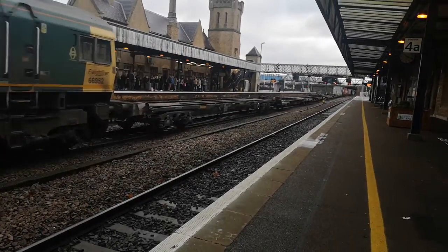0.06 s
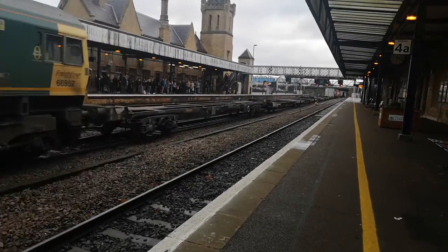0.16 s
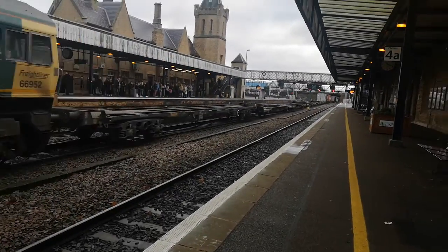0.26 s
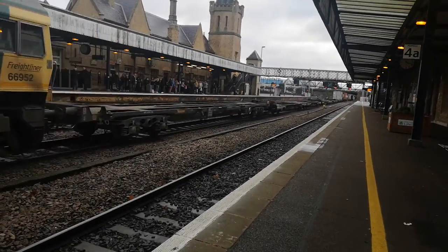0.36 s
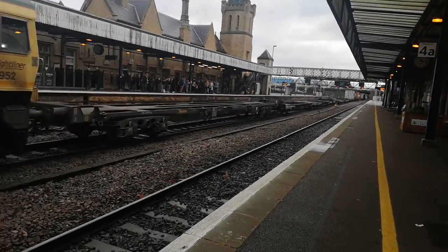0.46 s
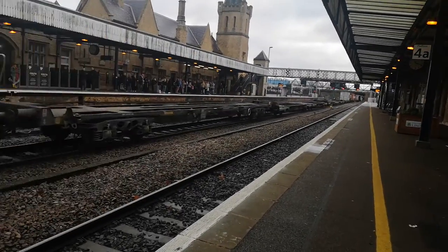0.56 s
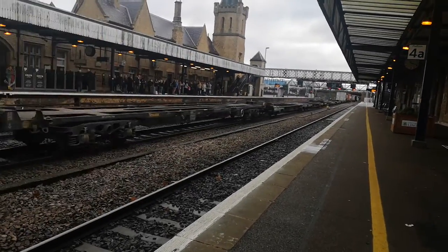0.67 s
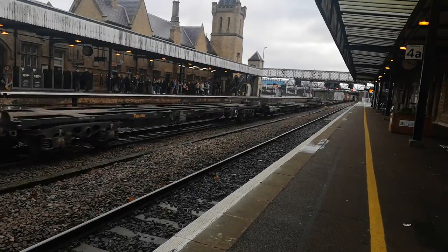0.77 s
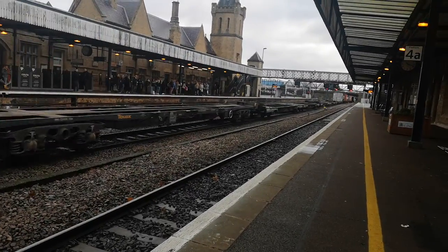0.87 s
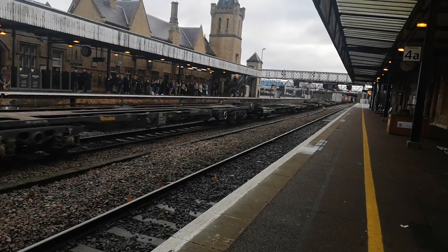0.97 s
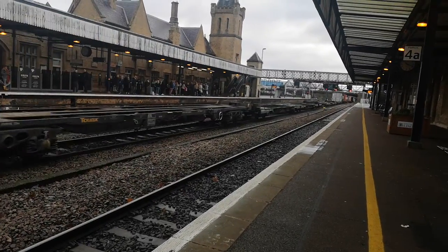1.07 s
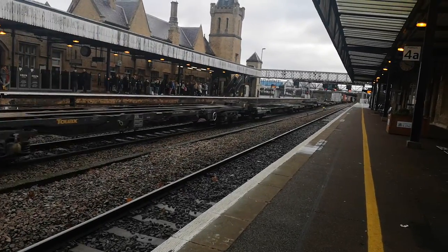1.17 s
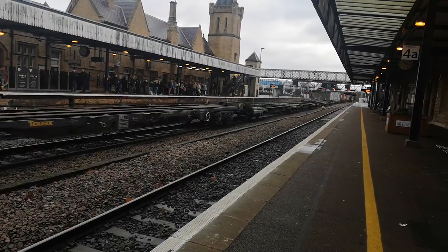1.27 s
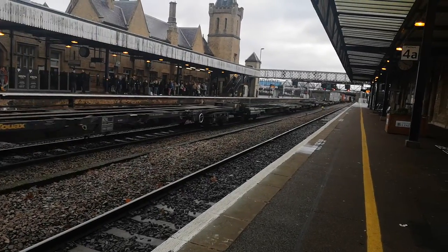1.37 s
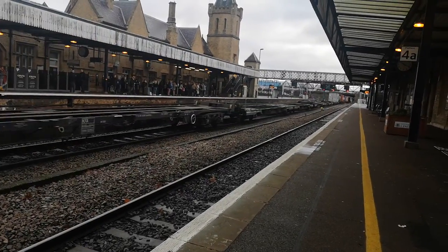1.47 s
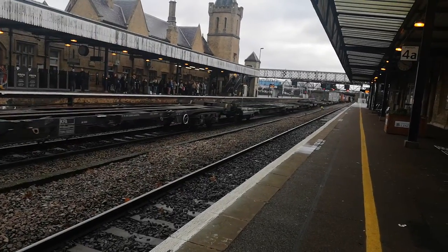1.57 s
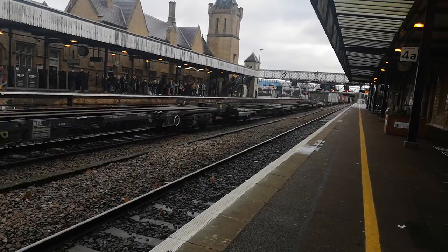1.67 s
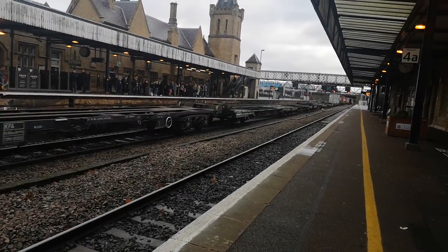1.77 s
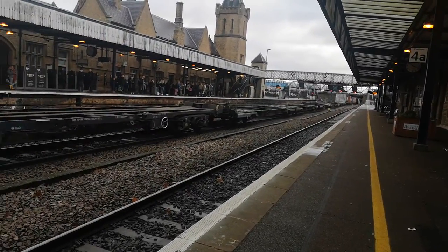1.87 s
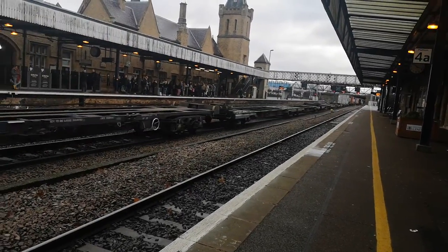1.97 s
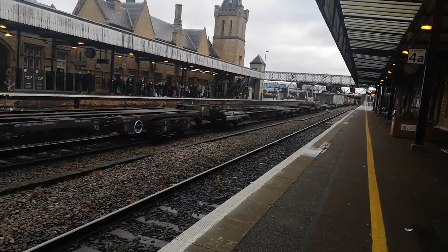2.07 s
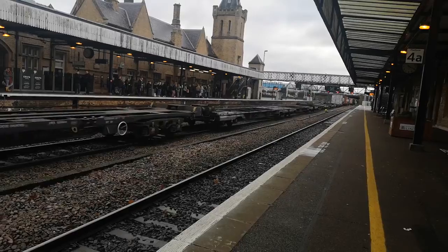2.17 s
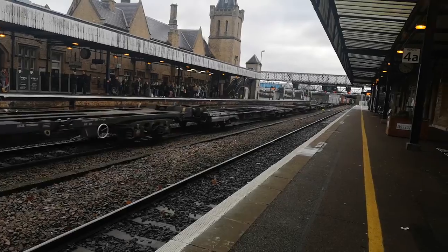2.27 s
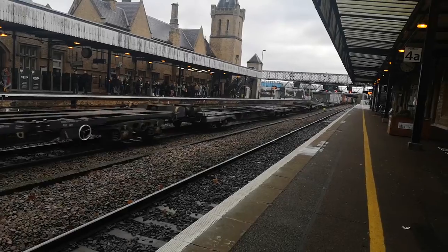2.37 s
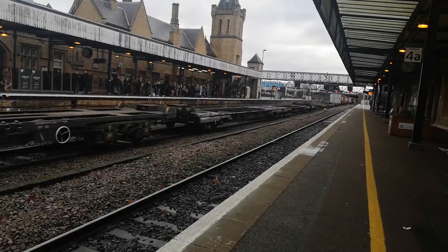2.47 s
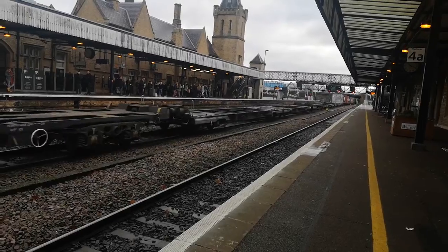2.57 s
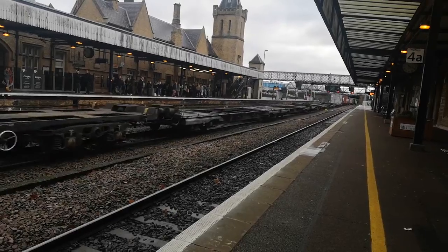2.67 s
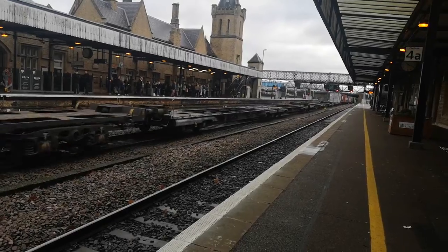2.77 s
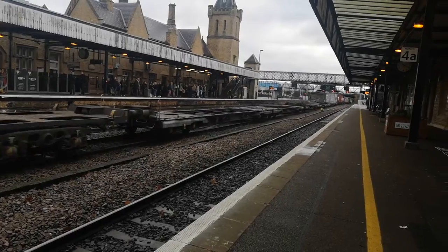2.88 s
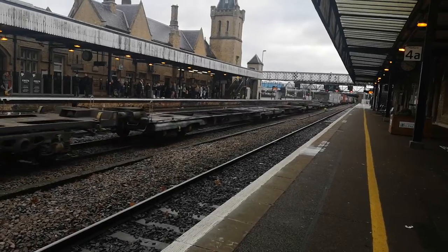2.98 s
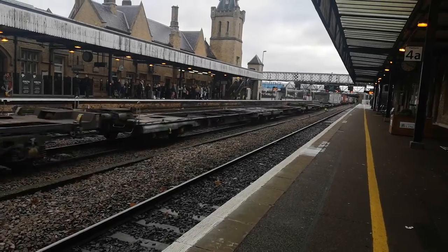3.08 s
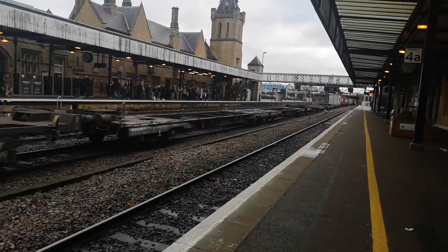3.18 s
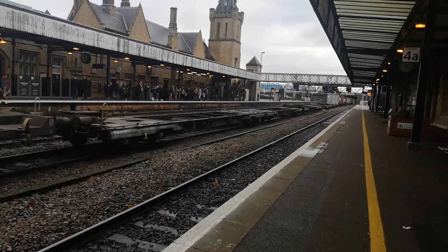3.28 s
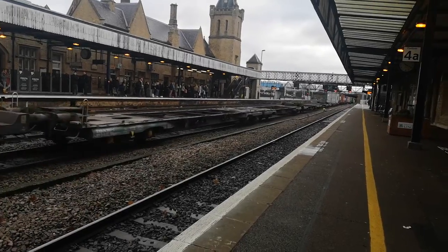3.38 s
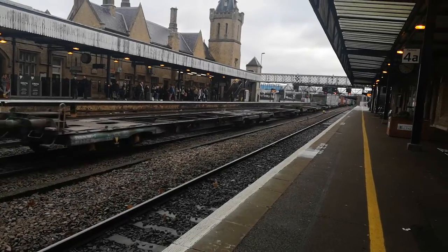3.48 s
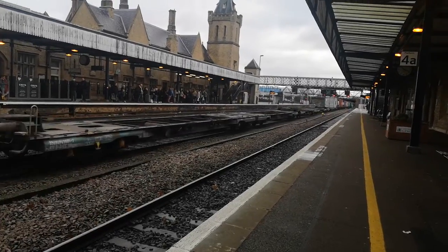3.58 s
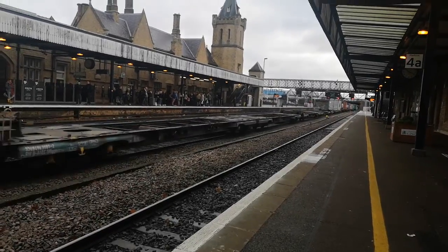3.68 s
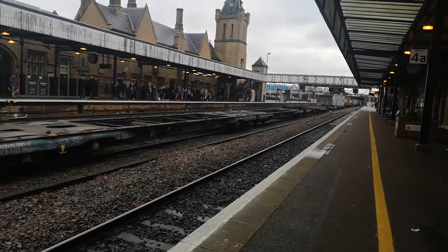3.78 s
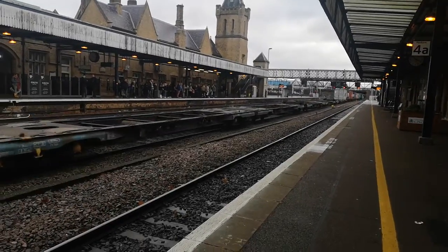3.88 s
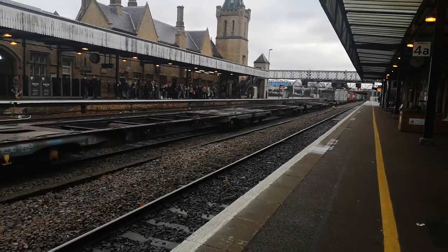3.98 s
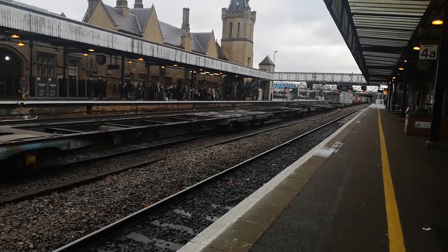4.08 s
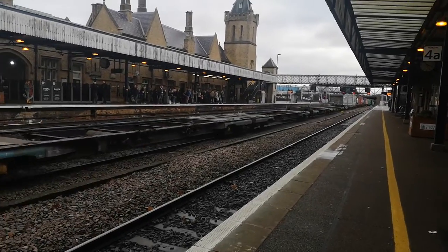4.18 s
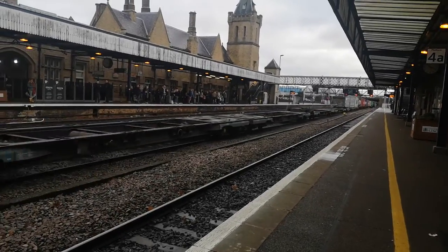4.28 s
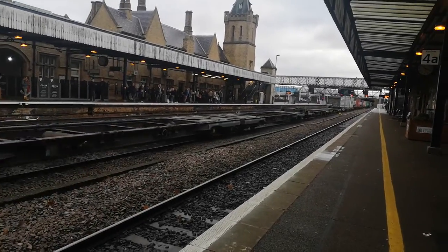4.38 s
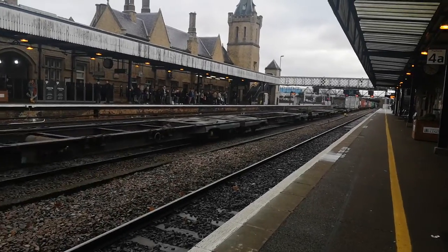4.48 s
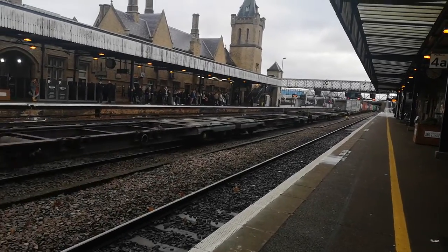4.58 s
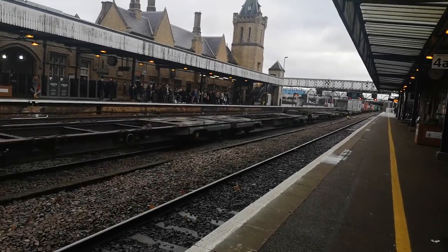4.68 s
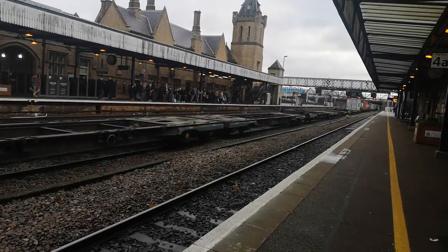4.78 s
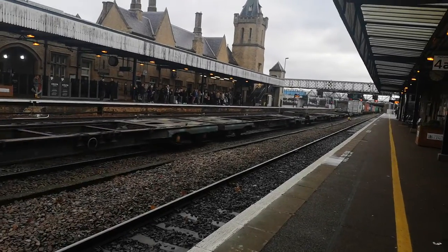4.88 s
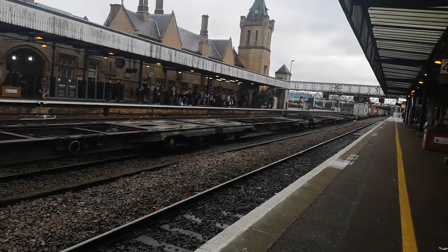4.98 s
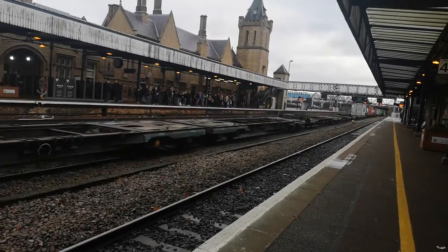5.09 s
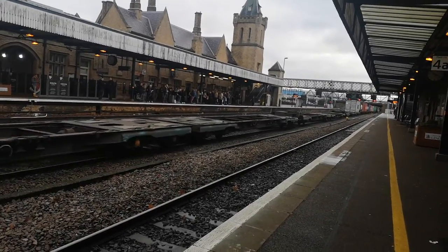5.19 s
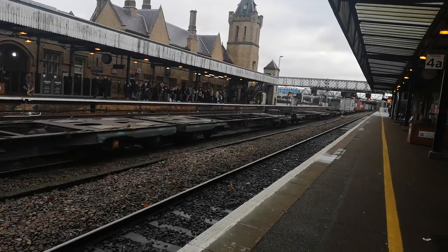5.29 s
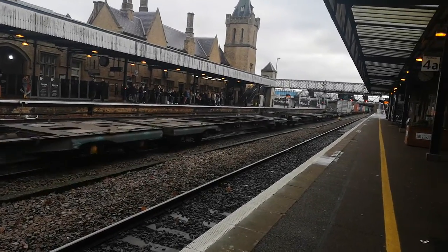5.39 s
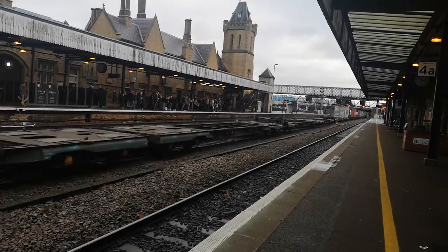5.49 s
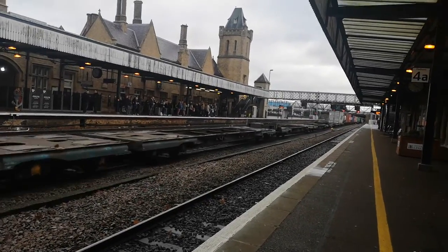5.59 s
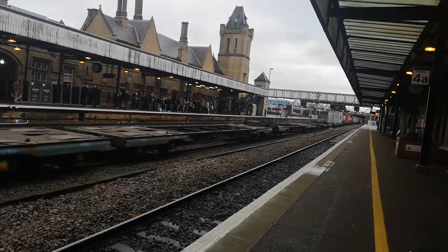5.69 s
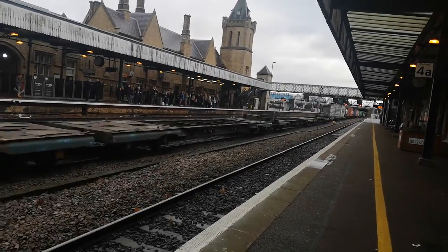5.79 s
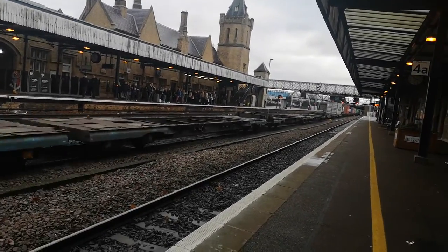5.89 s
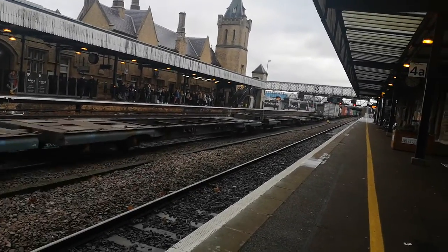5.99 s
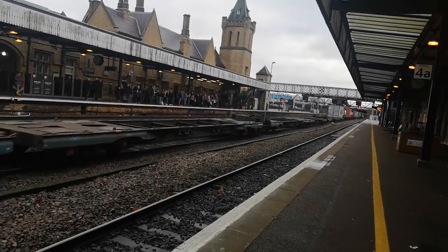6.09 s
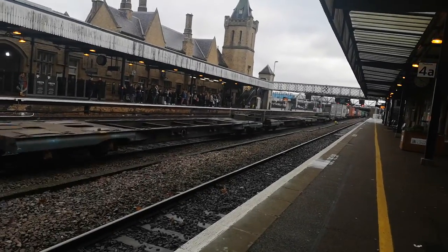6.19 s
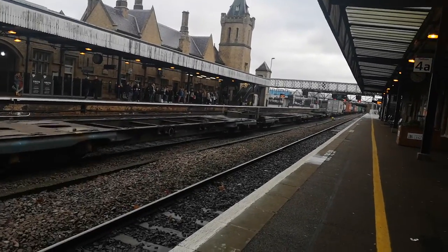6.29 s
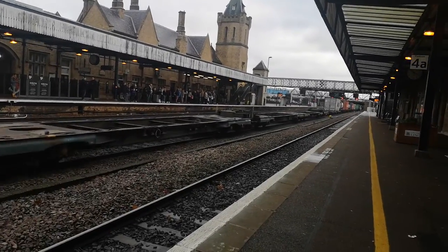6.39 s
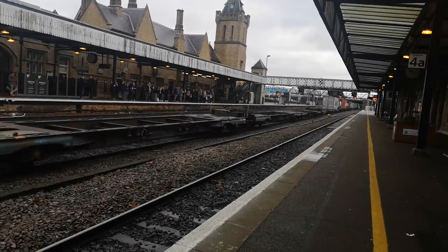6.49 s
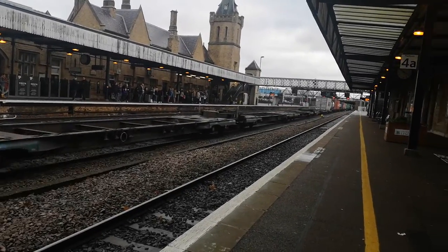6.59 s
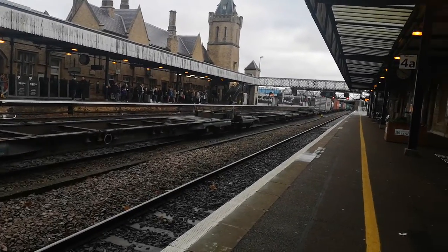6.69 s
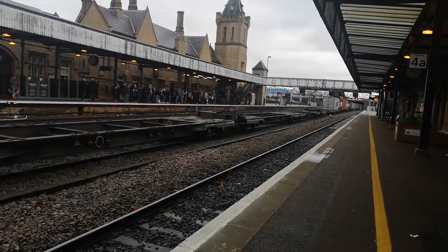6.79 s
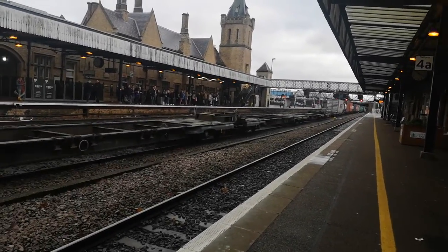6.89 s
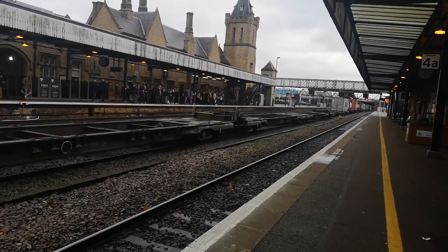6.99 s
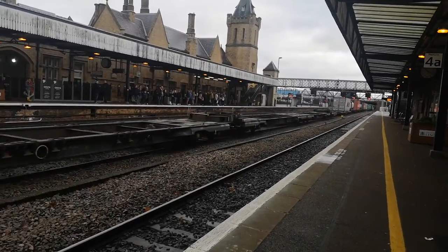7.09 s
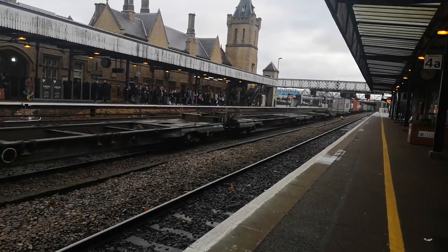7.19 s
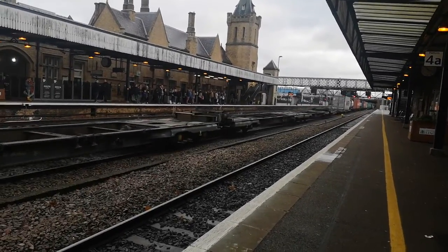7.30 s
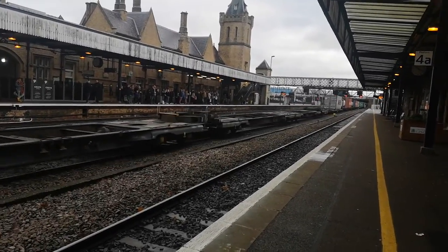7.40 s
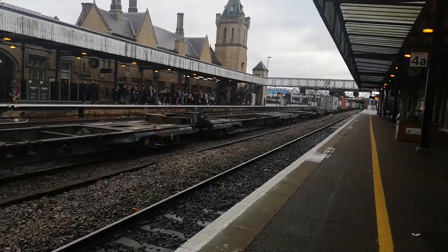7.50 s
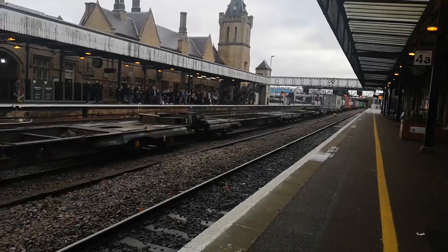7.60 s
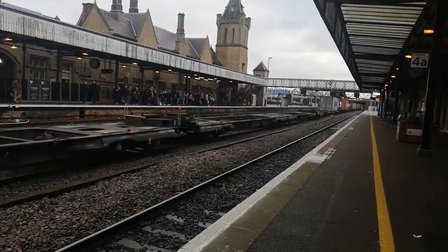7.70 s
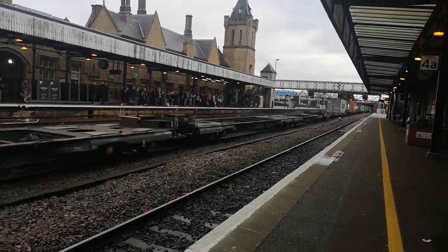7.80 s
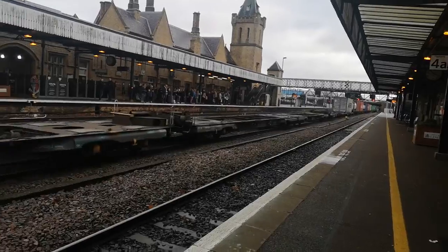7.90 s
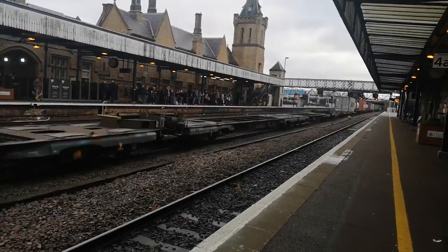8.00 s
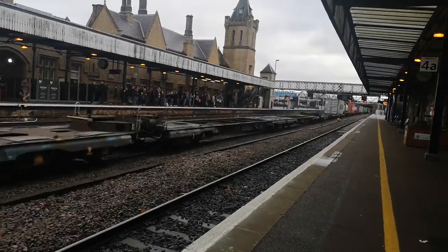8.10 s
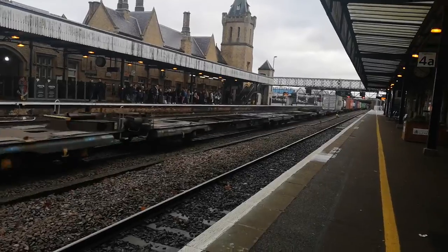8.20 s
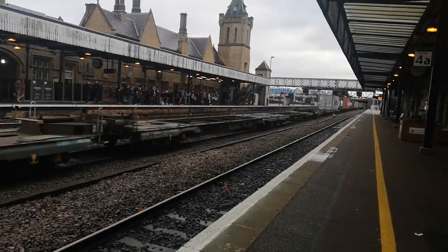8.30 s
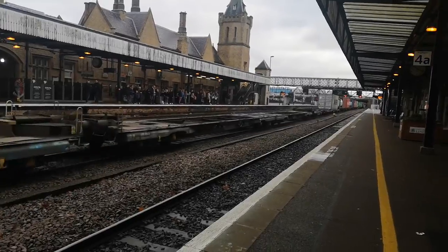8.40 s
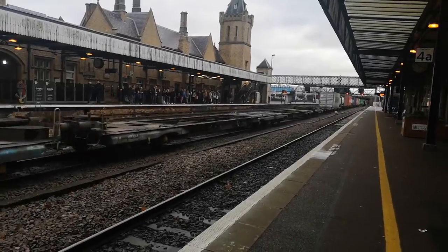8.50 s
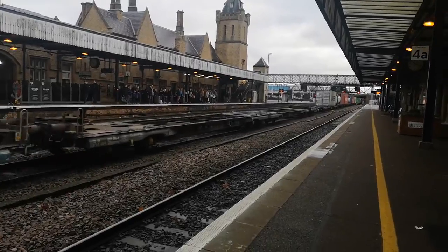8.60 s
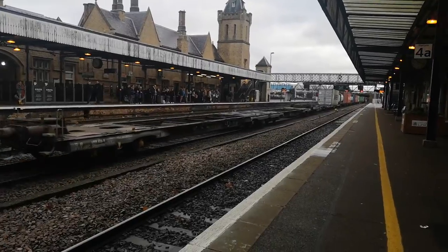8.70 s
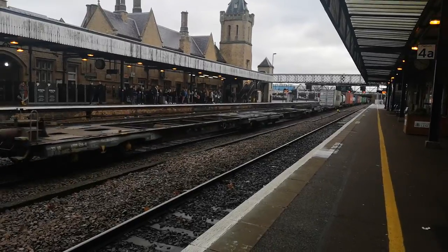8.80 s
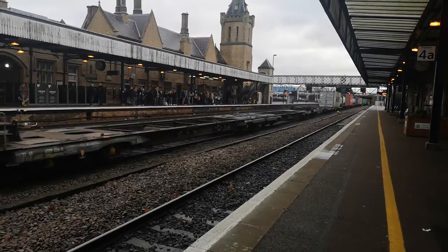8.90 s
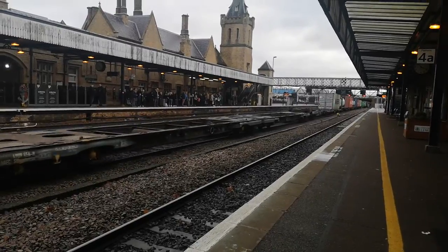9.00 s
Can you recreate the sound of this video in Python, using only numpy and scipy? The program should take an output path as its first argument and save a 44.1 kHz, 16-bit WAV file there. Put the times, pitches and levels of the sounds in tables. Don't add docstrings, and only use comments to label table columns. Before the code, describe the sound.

Deep diesel throb and bright metallic rattle pass close by, giving way to booming, hissing wagons, faint wheel ringing and a late low hum.

```python
import sys
import numpy as np
from scipy import signal
from scipy.fft import rfft, irfft, next_fast_len
from scipy.io import wavfile

SR = 44100
rng = np.random.default_rng(int(sys.argv[2]) if len(sys.argv) > 2 else 0)


def boost(x):
    u = np.asarray(x, float) / 20
    return 10 ** u


def master(y):
    cut = np.clip(np.atleast_2d(y).T, -1, 1)
    pcm = np.round(cut * 32767)
    wavfile.write(sys.argv[1], SR, pcm.astype(np.int16))


N = 398654

# pitch_hz, side_mid_db
STEREO_WIDTH = [(25, -27), (90, -23), (190, -11.5), (280, -9.5), (410, 1), (600, 7.5), (900, 6.5),
                (1300, 0), (15000, 0.5)]
# pitch_hz, left_right_db
PORT_LEAN = [(60, -0.5), (280, -0.4), (600, 1), (900, 1), (1900, 1.5), (2800, 1.5), (4100, 5.5),
             (6000, 4.5), (7600, 10.5), (9000, -5.5), (12000, -3)]
# pitch_hz, lead_rad
PORT_LEAD = [(40, .06), (200, 0), (350, 0.00064), (450, 0.94), (600, 0), (1000, 0.17)]
BASS_LEAD_S = 0.00028

# time_s, turns_per_s
CRANK = [(0.0, 5.75), (.5, 5.735), (1.5, 5.66), (2.0, 5.64), (3.7, 5.63), (4.2, 5.66), (4.9, 5.805),
         (5.2, 5.79), (6.0, 5.664), (6.5, 5.62), (7.0, 5.516), (8.0, 5.171), (9.04, 4.736)]
# time_s, exhaust_level_db, echo_extra_path_m
LOCOMOTIVE = [(0, -12.7, 11.4), (.75, -12.5, 11.3), (1.5, -13.1, 11.0), (2, -16.7, 11.6), (2.3, -20, 11.3),
              (2.55, -23.5, 10.2), (2.8, -19, 8.55), (3.1, -18.5, 7.4), (3.5, -21.6, 6.75),
              (3.8, -23.6, 5.6), (4.3, -25.6, 4.9), (5, -26.7, 4.2), (6, -28.8, 3.95), (7, -36.2, 3.75),
              (8, -40, 3.5), (9.04, -43, 3.5)]
# time_s, level_db
AXLE_WEIGHT = [(0, -3.5), (.55, -4), (.85, -2.5), (1.2, -5), (1.8, -3), (2.1, 1), (2.6, 0), (3.3, .5),
               (3.8, -0.5), (4.25, 0), (4.8, -2), (5.5, -3.5), (5.9, -5.5), (6.3, -5.5), (7.1, -4),
               (7.8, -4.5), (9.04, -6.5)]

# time_s, pitch_hz, level_db
RAIL_HUM = [
    (7.3, 100.1, -45.5),
    (7.85, 102, -34),
    (8.15, 103.5, -38.5),
    (8.4, 103, -29),
    (8.7, 100.8, -26),
    (8.9, 104, -22),
    (9.04, 102.6, -17.5),
]
# pitch_hz, density_db (per Hz)
AIR_TONE = [(3000, 0.5), (4200, -1), (5500, 1.5), (6300, -3), (7500, -1), (8300, -9), (9300, -15.5),
            (9900, -28), (12000, -48)]
# pitch_hz, density_db (per Hz)
EDGE_TONE = [(4000, -75.5), (8000, -21), (10000, 1), (12500, -3), (15000, -8.5)]
# time_s, hiss_db, top_edge_db, half_length_s
AIR_PUFFS = [(0.063, 6, 2, .04), (0.228, 2.5, -0.5, 0.034), (0.44, 7.5, 1.5, 0.027),
             (0.61, 3.5, -3.5, 0.031), (0.79, 1, 9, 0.036), (0.967, 5.5, 10, .04), (1.18, -1, -4, 0.02),
             (1.338, 5.5, 5, 0.054), (2.046, 5, 10.5, 0.044), (2.11, 1, 2, 0.046), (2.395, 1, 0, 0.06),
             (3.205, 1.5, 3, 0.1), (4.103, 1.5, 1, 0.048), (5.294, 2, -1.5, 0.16), (5.87, 4, 0, 0.023),
             (6.75, -3, 0.5, 0.046), (6.986, 6, 5, .055), (7.155, 5.5, 4.5, 0.068)]
HISS_DB, HISS_ROLLS, HISS_FADES = -41.5, 0.95, 0.085

# time_s, level_db
DISC_RINGING = [
    (0, -71),
    (4, -50),
    (4.7, -50.5),
    (6.5, -47.5),
    (8.2, -50),
    (9.04, -47),
]
# pitch_hz, width_hz, level_db
DISC_MODES = [(898, 42, -16), (1242, 74, -8), (1614, 90, -1), (1730, 420, 0), (2390, 100, 0.5),
              (2730, 90, -8), (2790, 90, -2), (3237, 150, -5), (3620, 270, -5), (4087, 115, -8.5),
              (5140, 220, -12.5)]
# pitch_hz, tone_db
ROLLING_TONE = [(16, -24.5), (29, -13.5), (45, 1.5), (95, -0.5), (122, -5), (190, -1), (320, -1.5),
                (450, -1), (700, 1.5), (1050, -3.5), (1500, -0.5), (2300, 2.5), (3200, -7), (4500, -11.5),
                (7000, -31)]
# pitch_hz, density_db (per Hz), axle_share, locomotive_fade_share, flicker_db
ROARING_PARTS = [(55, -48.5, 0.64, 0.029, 0.5), (109, -45.5, 1.1, 0.0, 1.5),
                 (176, -44.5, 0.98, -0.069, 2.0), (638, -70.5, 0.64, 0.17, 0.64),
                 (2170, -68.5, .9, 0.078, 0.87)]

# top_s, level_db, length_s
SHARED_PITCH_BOOMS = [(.24, -21.5, .18), (.48, -26.5, 0.26), (.77, -27.5, .26), (1.3, -35, .6), (1.72, -24, 0.346),
                      (2.52, -21, .2), (2.82, -25, 0.23), (3.16, -25.5, .27), (4.05, -32, 0.44), (4.68, -31, 0.41),
                      (4.89, -26, .15), (5.11, -32.5, 0.47), (5.35, -33, .3)]
SHARED_PITCH_HZ = 181.4
# top_s, pitch_hz, level_db, length_s
LOW_BOOMS = [(.45, 323, -39, 0.47), (.69, 165, -32.5, .25), (2.27, 206, -28, .26),
             (2.42, 157, -27.5, 0.43), (2.75, 254.6, -27, 0.14), (3.39, 214.1, -27, .2),
             (3.5, 186, -28, .25), (3.43, 167.1, -25, .27), (4.5, 132, -28.5, 0.36),
             (4.5, 166.3, -29, 0.22), (4.61, 203.2, -30.5, .27), (5.6, 197, -32.5, .8),
             (7.08, 202.5, -34, .31)]

# first_knock_s, length_s, peak_db, first_hz, last_hz
PANEL_BOUTS = [(0.024, 0.0096, -33, 6100, 6100), (.0528, .029, -28.5, 7400, 7740),
               (.1693, .059, -28, 6700, 6500), (0.2546, .029, -24, 7100, 6900),
               (0.315, .147, -26, 7070, 7300), (0.52, .088, -29, 7500, 8700),
               (0.727, .059, -32.5, 7100, 6640), (1.374, 0, -37, 6550, 6550), (1.4950, 0, -38, 6300, 6300),
               (1.7915, .059, -32, 6550, 6650), (2.029, 0, -31, 6100, 6000), (2.148, 0, -37, 5900, 5900),
               (2.197, 0, -25, 5940, 5940)]
KNOCK_SPREAD_DB, KNOCK_SPREAD_HZ = -0.5, 270
PANEL_PAN_DB, PANEL_PAN_LOSS_DB_PER_S = 13, 4.0

# pitch_hz, width_hz, level_db, fade_s (until 10 dB down)
MACHINERY_MODES = [(899, 22, -54, 6), (3014, 51, -51, 6.5), (5580, 75, -56, 3), (2364, 90, -49, 1),
                   (320.3, 10, -44, 5)]
# crank_multiple, level_db
FIRING_ORDERS = [
    (6, 0),
    (9, -2.3),
    (15, -3.5),
]
# crank_multiple, level_db
UNEVEN_ORDERS = [(4, -25), (5, -23), (7, -2.5), (8, -5.5), (10, -12.5), (11, -11), (12, -16), (13, -13),
                 (14, -18), (16, -9), (17, -12), (18, -13), (19, -17), (20, -23), (21, -29), (22, -24),
                 (23, -19)]
UNEVEN_DB, UNEVEN_FOLLOWS = -12.5, 0.62
ECHO_NEAR, ECHO_FAR = 0.5, 0.9
ECHO_FROM_S, ECHO_TO_S = 2.2, 3.6


def rms_one(x):
    return x / np.sqrt(np.mean(x ** 2) + 1e-20)


def in_time(rows):
    s, *columns = np.transpose(rows)
    return [np.interp(np.arange(N) / SR, s, column) for column in columns]


def at_hz(points, hz):
    points_hz, values = np.transpose(points)
    return np.interp(np.log(hz), np.log(points_hz), values)


def drift(rate):
    r = np.exp(-80 * np.pi * rate / SR)
    chance = rng.standard_normal(N // 40 + 2002)
    slow = signal.lfilter([1], [1, -2 * r, r * r], chance)[2000:]
    return np.interp(np.arange(N) / 40, np.arange(len(slow)), rms_one(slow))


def ports(mid, side, hz):
    lean = boost(at_hz(PORT_LEAN, hz) / 2)
    side = side * boost(at_hz(STEREO_WIDTH, hz))
    return np.array([(mid + side) * lean, (mid - side) / lean])


def left_first(x):
    sample = np.arange(N)
    return np.array([x, np.interp(sample - BASS_LEAD_S * SR, sample, x)])


def coloured(tone):
    size = next_fast_len(N)
    hz = np.maximum(np.arange(size // 2 + 1) * SR / size, 1)
    white = rfft(rng.standard_normal((2, size)))
    left, right = ports(*white * boost(at_hz(tone, hz)) * np.sqrt(SR / 2), hz)
    return np.array([left, right * np.exp(-1j * at_hz(PORT_LEAD, hz))]), hz


def noise_bands(tone):
    spectra, hz = coloured(tone)
    lowest = np.floor(2 * np.log2(tone[0][0])) / 2
    for centre in 2 ** np.arange(lowest, np.log2(tone[-1][0]) + 0.5, 0.5):
        near = slice(*np.searchsorted(hz, [centre / np.sqrt(2), centre * np.sqrt(2)]))
        band = np.zeros_like(spectra)
        band[:, near] = spectra[:, near] * np.cos(np.pi * np.log2(hz[near] / centre)) ** 2
        yield centre, irfft(band)[:, :N]


def resonate(x, hz, width_hz):
    r = np.exp(-np.pi * width_hz / SR)
    poles = [1, -2 * r * np.cos(2 * np.pi * hz / SR), r * r]
    return signal.lfilter([(1 - r * r) / 2, 0, (r * r - 1) / 2], poles, x)


def singing(modes):
    drive = rng.standard_normal((2, N + 4000))
    for k, (hz, width_hz, *_) in enumerate(modes):
        stretch = np.roll(drive, 9001 * k, axis=1)
        mid, side = resonate(resonate(stretch, hz, width_hz), hz, width_hz)[:, 4000:]
        yield ports(rms_one(mid), rms_one(side), hz)


def crank_angle():
    return 2 * np.pi * np.cumsum(in_time(CRANK)[0]) / SR


def swings():
    loco_db = in_time(LOCOMOTIVE)[0]
    return in_time(AXLE_WEIGHT)[0], loco_db - loco_db[0]


def hum():
    hz, db = in_time(RAIL_HUM)
    return np.sqrt(2) * boost(db) * np.sin(2 * np.pi * np.cumsum(hz) / SR)


def air():
    (roll_db, fade_db), s = swings(), np.arange(N) / SR
    leak_db = HISS_ROLLS * roll_db + HISS_FADES * fade_db
    flutter_db = 0.54 * drift(11) + 0.4 * drift(30) + 0.31 * drift(120)
    flutter_db = flutter_db + 0.56 * np.cos(6 * crank_angle())
    hiss = sum(band * boost(0.5 * drift(43)) for hz, band in noise_bands(AIR_TONE))
    edge = irfft(coloured(EDGE_TONE)[0])[:, :N]
    puff_db, edge_db = 0, 0
    for at, db, top_db, half_s in AIR_PUFFS:
        puff = np.exp(-((s - at) / half_s) ** 2)
        puff_db = puff_db + db * puff
        edge_db = edge_db + top_db * puff
    hiss_gain = boost(HISS_DB + leak_db + puff_db - 38)
    edge_gain = boost(0.38 * leak_db + edge_db - 109)
    return boost(flutter_db) * (hiss_gain * hiss + edge_gain * edge)


def wheels():
    modes = 0
    for (hz, width_hz, db), tone in zip(DISC_MODES, singing(DISC_MODES)):
        modes = modes + boost(db + 0.4 * drift(6.8)) * tone
    return boost(in_time(DISC_RINGING)[0]) * modes


def rolling():
    (roll_db, fade_db), together, out = swings(), drift(3.4), 0
    part_hz, *columns = np.transpose(ROARING_PARTS)
    for hz, band in noise_bands(ROLLING_TONE):
        db, rolls, fades, flicker_db = [np.interp(np.log(hz), np.log(part_hz), c) for c in columns]
        level_db = db + rolls * roll_db + fades * fade_db
        out = out + band * boost(level_db + 0.4 * together + flicker_db * drift(9.1))
    return out


def booms():
    rows = [(s, SHARED_PITCH_HZ, db, length_s) for s, db, length_s in SHARED_PITCH_BOOMS] + list(LOW_BOOMS)
    out = np.zeros(N + 2 * SR)
    for (top_s, hz, db, length_s), phase in zip(rows, rng.uniform(0, 7.4, len(rows))):
        swell = np.hanning(round(np.clip(1.6 * length_s, 0.1, 1.5) * SR))
        tone = swell * np.sin(2 * np.pi * hz * np.arange(len(swell)) / SR + phase)
        i = SR + round(top_s * SR) - len(swell) // 2
        out[i:i + len(swell)] += boost(db + 2.5) * tone
    return out[SR:SR + N]


def knocks():
    rows, chance = [], rng.standard_normal((len(PANEL_BOUTS), 10, 2))
    for (first_s, length_s, db, first_hz, last_hz), luck in zip(PANEL_BOUTS, chance):
        gap_s = 1 / (6 * np.interp(first_s, *np.transpose(CRANK)))
        count = round(length_s / gap_s) + 1
        for k, hz in enumerate(np.linspace(first_hz, last_hz, count)):
            at = first_s + k * gap_s
            knock_db = db + KNOCK_SPREAD_DB * luck[k, 0]
            knock_hz = hz + KNOCK_SPREAD_HZ * luck[k, 1]
            rows.append((at, knock_db, knock_hz, PANEL_PAN_DB - PANEL_PAN_LOSS_DB_PER_S * at))
    return rows


def ticks():
    out, s, rows = np.zeros((2, N)), np.arange(1300) / SR, knocks()
    chatter = rng.standard_normal((len(rows), 2, len(s))) * boost(-60 * s / 0.044) * 0.98
    for (at, db, hz, pan_db), burst in zip(rows, chatter):
        strike = resonate(burst + 2.3 * (s == 0), 7850, 4600)
        thud = resonate(strike, 5800, 3500)
        squeak = resonate(resonate(thud * 0 + strike, hz, 1200), hz, 1200)
        pan = np.array([[pan_db], [-pan_db]]) / 2
        i = round(at * SR)
        out[:, i:i + len(s)] += (1.2 * thud + 5.0 * squeak) * boost(db - 7.0 + pan)
    low_pass = signal.butter(4, 9300, fs=SR, output="sos")
    return signal.sosfilt(low_pass, out + 1e-18) + 0.26 * out


def machinery():
    s, out = np.arange(N) / SR, 0
    for (hz, width_hz, db, fade_s), tone in zip(MACHINERY_MODES, singing(MACHINERY_MODES)):
        out = out + boost(db - 10 * (s / fade_s) ** 2 + 0.94 * drift(9.2)) * tone
    return out


def engine():
    step = 20
    s = np.arange(0, N, step) / SR
    level_db, extra_m = [curve[::step] for curve in in_time(LOCOMOTIVE)]
    turns, angle = in_time(CRANK)[0][::step], crank_angle()[::step]
    echo = np.interp(s, [ECHO_FROM_S, ECHO_TO_S], [ECHO_NEAR, ECHO_FAR])
    lag = 2 * np.pi * turns * extra_m / 343
    strong = [(k, boost(level_db + db) * abs(1 - echo * np.exp(1j * k * lag))) for k, db in FIRING_ORDERS]
    uneven_db = UNEVEN_DB + UNEVEN_FOLLOWS * level_db
    weak = [(k, boost(uneven_db + db - 1.5 + 2.2 * drift(0.6)[::step])) for k, db in UNEVEN_ORDERS]
    beat = sum(gain * np.sin(k * angle + rng.uniform(0, 6.7)) for k, gain in strong + weak)
    full_rate = signal.resample_poly(beat, step, 1, window=("kaiser", 12), padtype="line")
    return np.sqrt(2) * full_rate[:N]


def scene():
    bass = left_first(hum() + booms() + engine())
    return bass + air() + wheels() + rolling() + ticks() + machinery()


def top_cut(x):
    return signal.sosfilt(signal.butter(12, 15140, fs=SR, output="sos"), x)


def record(dry):
    s = np.arange(N) / SR
    rounded = 1.5 * np.tanh(dry / 1.5)
    mix = rounded * np.clip(s[::-1] / 0.003, 0, 1)
    return top_cut(mix)


dry = scene()
out = record(dry)
master(out)
```